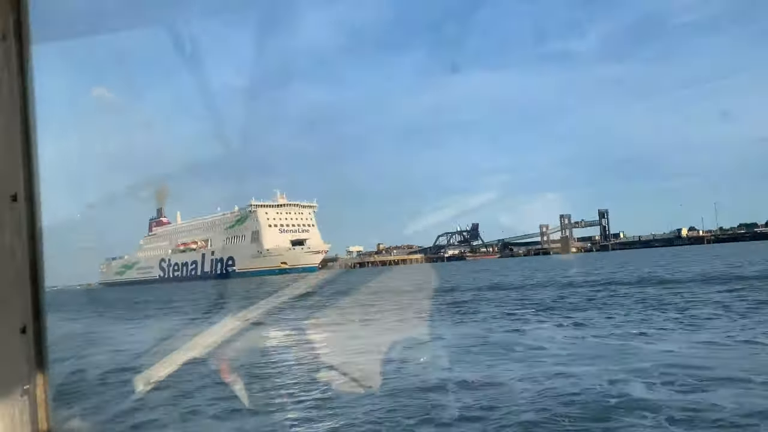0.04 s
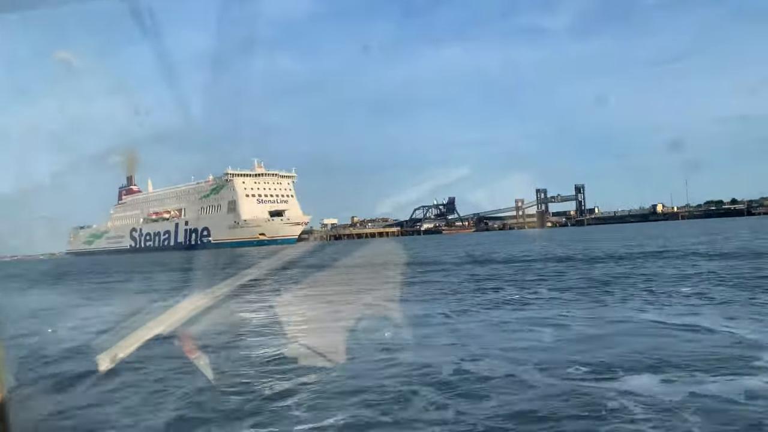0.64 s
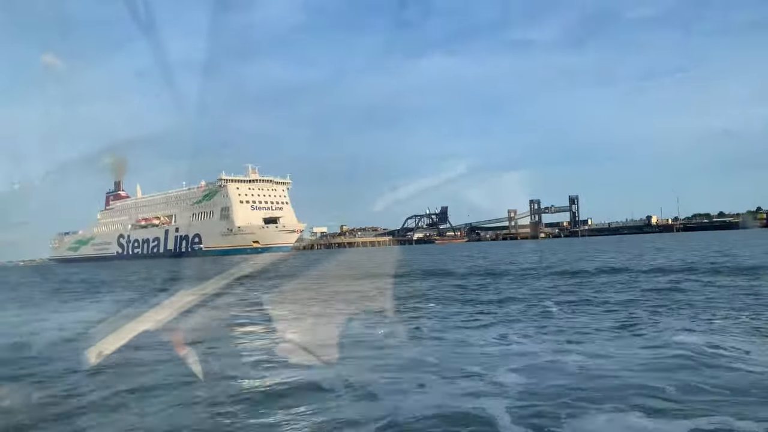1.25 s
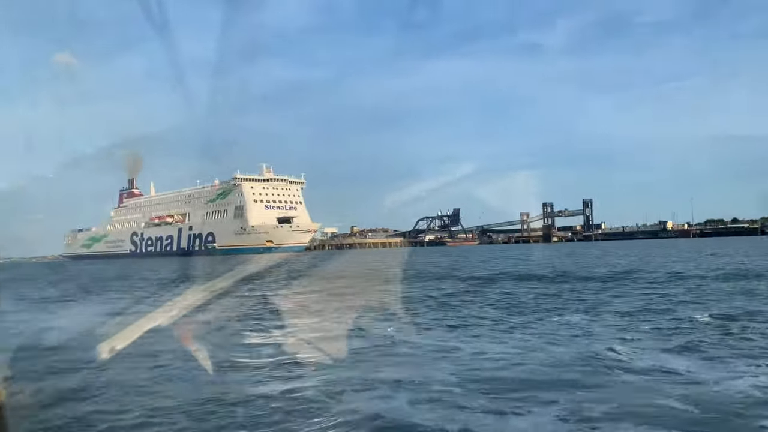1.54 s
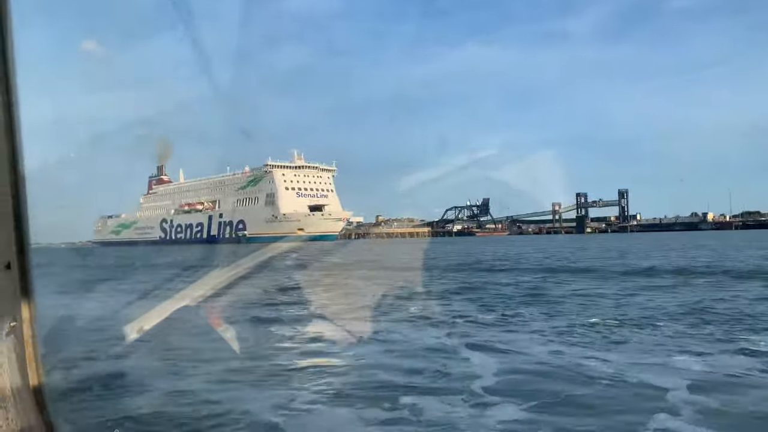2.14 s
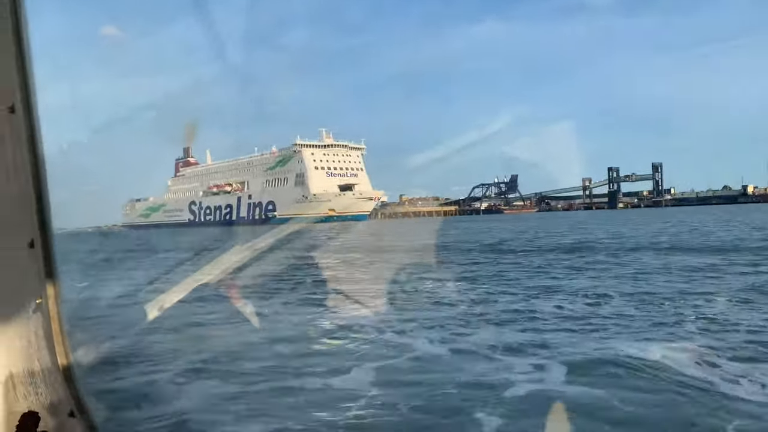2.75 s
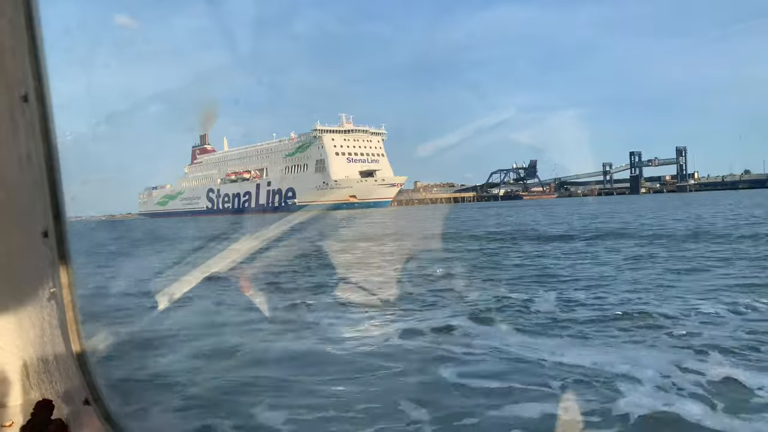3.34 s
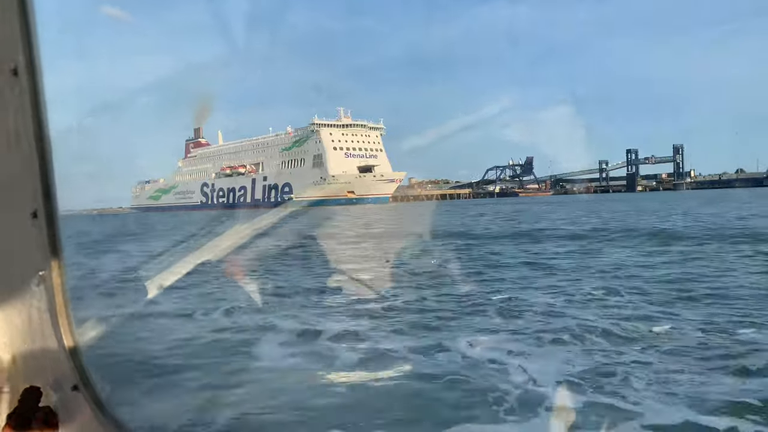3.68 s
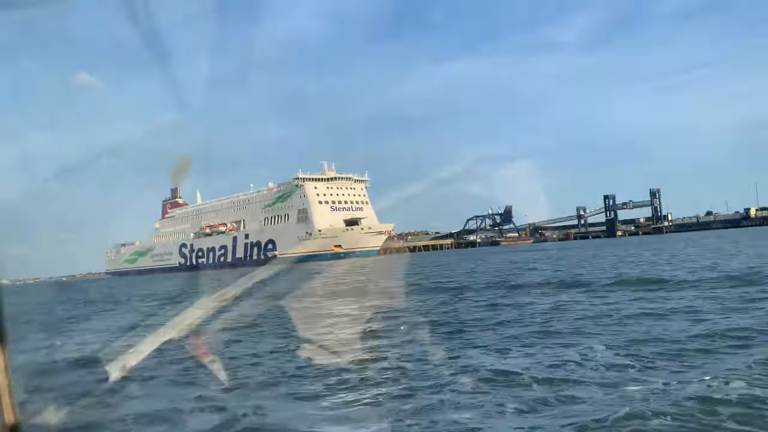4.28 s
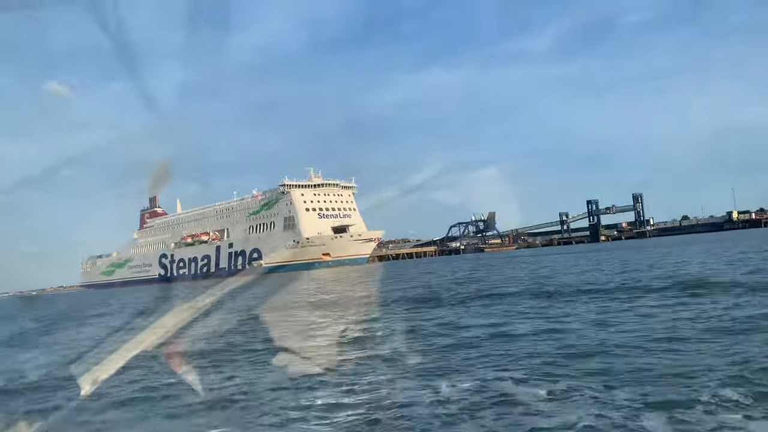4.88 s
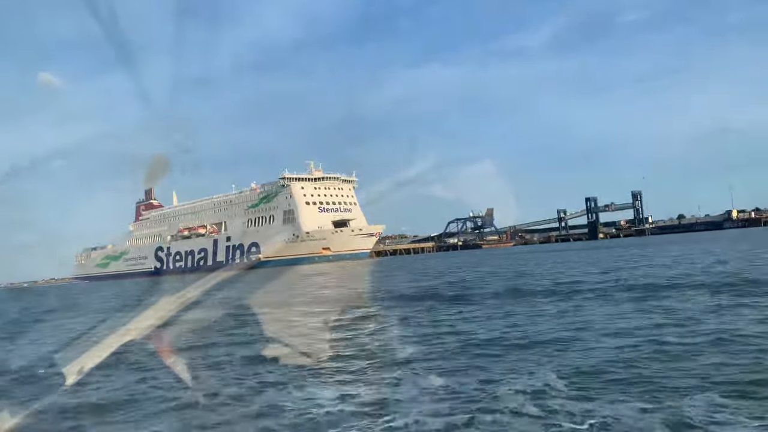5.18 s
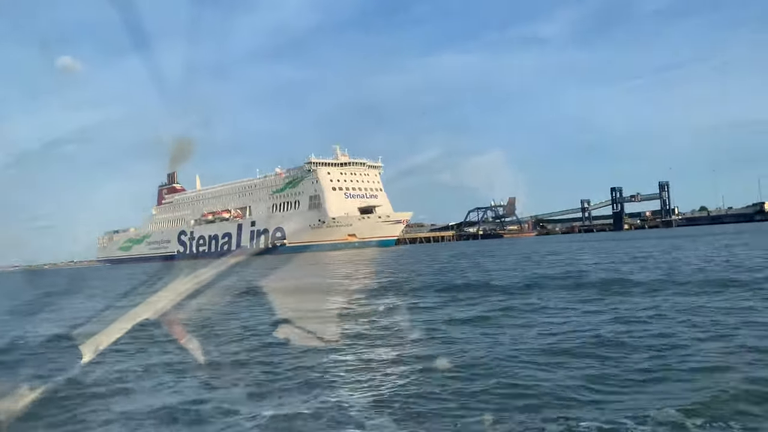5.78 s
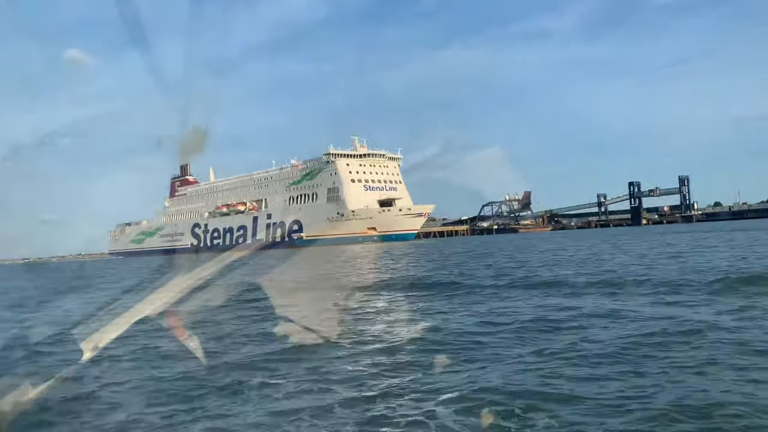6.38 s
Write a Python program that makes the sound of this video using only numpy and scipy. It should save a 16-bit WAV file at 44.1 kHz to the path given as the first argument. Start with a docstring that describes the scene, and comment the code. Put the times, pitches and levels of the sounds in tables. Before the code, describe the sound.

An outboard motor runs at cruising speed for the whole six and a half seconds, heard from inside a small boat's cabin. Its low drone booms at a nearly constant pitch, with a thin, wavering whine above it. Water rumbles deeply under the hull, while quieter foam, fine spray and small bubbles rush along the sides.

Soft hull thuds come in the first half second, followed by a few light wave slaps up to about 1.2 seconds. Stronger slaps with dull thumps land near 2.0 and 2.4 seconds. More follow at 3.2 and 3.4, faintly rattling a loose fitting. A brief hollow gurgle leads into the heaviest thuds at 3.8 and 4.1 seconds. A dull slap hits a panel at 4.6, a sharp smack at 5.1, and another slap with a thud at 5.3. Lighter splashes continue until about 6.1 as the motor drones on.

```python
"""Inside the cabin of a small boat at cruising speed, pushed by a four-cylinder four-stroke outboard.
Periodic combustion gives a harmonic series: the firing note booms in the cabin among weaker lines and
a thin whine, and the revs sway with the chop. Turbulence rumbles under the hull, foam rushes along its
sides, spray fizzes and bubbles ring. Now and then the hull thuds into a trough, or a wave slaps a
panel and rattles a loose fitting."""
import sys
import numpy as np
from scipy import signal
from scipy.fft import rfft, irfft
from scipy.io import wavfile
from scipy.ndimage import map_coordinates

SR = 44100
rng = np.random.default_rng(int(sys.argv[2]) if len(sys.argv) > 2 else 0)


def wrap_up_sound(samples):
    """Save the sound to the file named by the first command line argument, as 16-bit audio."""
    columns = np.atleast_2d(samples).T
    # keep every value between -1 and 1, then stretch to whole-number steps
    tamed = np.clip(columns, -1, 1)
    steps = np.round(tamed * 32767).astype(np.int16)
    wavfile.write(sys.argv[1], SR, steps)


N = 291942
TIME = np.arange(N) / SR
FREQ = np.maximum(np.arange(N // 2 + 1) * SR / N, 1)


def undb(db):
    """Decibels to amplitude ratio."""
    return 10 ** (np.asarray(db) / 20)


def unit(x):
    """Normalisation to rms 1."""
    return x / np.sqrt(np.mean(x ** 2))


def noise():
    """Two uncorrelated white noises."""
    return rng.standard_normal((2, N))


def walk(rate):
    """Smooth random drift through `rate` values a second, with a spread near 1."""
    knots = rng.standard_normal(1024)
    position = np.arange(0, N, 64) / SR * rate
    return 1.1 * map_coordinates(knots, [position], order=3, mode="wrap").repeat(64)[:N]


def swell(s, half_s):
    """A Gaussian rise and fall, 1 at its height."""
    return np.exp(-((TIME - s) / half_s) ** 2)


def easing(db_per_s):
    """A linear drift of level in dB, zero halfway through."""
    return db_per_s * (TIME - TIME.mean())


def decay(age, t60):
    """Exponential damping, 60 dB down at age t60."""
    return np.exp(-np.log(1000) * age / t60)


def stereo(mid, side):
    """Left and right as sum and difference."""
    return np.array([mid + side, mid - side])


def pan(db):
    """Interaural level difference: gains that put the left ear db above the right."""
    return undb([[db / 2], [-db / 2]])


def arriving(spectrum, lead_ms):
    """Interaural time difference: the left ear leads (lags if negative)."""
    return spectrum * np.exp(1j * np.pi * FREQ * lead_ms / 1000 * np.array([[1], [-1]]))


def coloured(colour, drive):
    """Spectral shaping: two drives become left and right spectra, falling steeply outside the table."""
    hz, db, correlation = np.transpose(colour)
    octave, knots = np.log2(FREQ), np.log2(hz)
    outside = np.abs(octave - np.clip(octave, knots[0], knots[-1]))
    gain = undb(np.interp(octave, knots, db) - 20 * outside) * np.sqrt(SR / 2)
    like = np.clip(np.interp(octave, knots, correlation), -1, 1)
    mid = rfft(drive[0]) * np.sqrt((1 + like) / 2)
    side = rfft(drive[1]) * np.sqrt((1 - like) / 2)
    return gain * stereo(mid, side)


def churn(spectrum, low_db, high_db, split_hz, flicker_db, flicker_rate):
    """Amplitude modulation: octave bands flicker about low_db below the split and high_db above it."""
    out = 0
    for octave in range(4, 15):
        band = irfft(spectrum * np.maximum(1 - np.abs(np.log2(FREQ) - octave), 0), N)
        high = 1 / (1 + (split_hz / 2 ** octave) ** 4)
        out = out + band * undb((1 - high) * low_db + high * high_db + flicker_db * walk(flicker_rate))
    return out


def ringing(hz, half_width_hz):
    """A resonance under random excitation, rms 1."""
    return unit(irfft(rfft(noise()) / (1 + ((FREQ - hz) / half_width_hz) ** 2), N))


def panel_ring(db=-45, hz=1450, throb_db=5.0):
    """Forced vibration: the engine shakes a panel that rings faintly, in uneven throbs."""
    return undb(db) * unit(ringing(hz, half_width_hz=55) * undb(throb_db * walk(7)))


# Air pockets along the hull. Each row: time of the peak in seconds, level in dB, note in Hz,
# half-length in seconds.
AIR_POCKETS = [(.55, -34, 1260, 0.017), (1.29, -43, 1230, 0.028), (2.34, -35, 1240, 0.033),
               (3.756, -33, 1240, 0.11), (4.16, -40, 1100, .03)]

def gulps():
    """Cavity resonance: a trapped pocket of air sounds its hollow note for a moment."""
    return sum(undb(db) * swell(s, half_s) * ringing(hz, half_width_hz=70)
               for s, db, hz, half_s in AIR_POCKETS)


def bubbles(db=-40.5, count=650, low_hz=1050, high_hz=4400, t60_cycles=100, glide=0.081):
    """Damped oscillation: each bubble in the wake rings on its own note, rising as it fades."""
    age = TIME[:SR // 10]
    out = np.zeros((2, N + len(age)))
    for when, pitch, size, left, right in rng.random((count, 5)):
        hz = low_hz * (high_hz / low_hz) ** pitch
        life = age * hz / t60_cycles
        phase = 2 * np.pi * (hz * age * (1 + glide * life) + np.array([[left], [right]]))
        ring = (1 - np.exp(-life * 20)) * decay(life, 1) * np.sin(phase)
        strength = undb(3 * min(-np.log(size), np.pi)) * np.sqrt(low_hz / hz)
        out[:, int(when * N) + np.arange(len(age))] += strength * ring
    return undb(db) * unit(out[:, :N])


def foam(drops_per_s, drop_share):
    """Shot noise: countless bursting drops of unequal size over a smooth hiss."""
    sizes = undb(2.6 * np.minimum(rng.exponential(size=(2, N)), 4))
    drops = noise() * (rng.random((2, N)) < drops_per_s / SR) * sizes
    return np.sqrt(1 - drop_share) * noise() + np.sqrt(drop_share) * unit(drops)


def cabin():
    """Interference: close reflections ripple the spectrum, mostly in the middle range."""
    ripple = 1.9 * np.interp(FREQ / 45, np.arange(2048), rng.standard_normal(2048))
    return undb(ripple * FREQ / (FREQ + 600) / (1 + (FREQ / 7000) ** 2))


# Spectra of the rush and the spray. Each row: frequency in Hz, relative spectral level in dB,
# interaural correlation (limited to -1..1 in use).
RUSH_SPECTRUM = [(400, -68, 0.78), (947, -57, 0.23), (990, -63, 0.041), (1360, -64.5, 0.46),
                 (2030, -65.5, 0.64), (2530, -68, -0.59), (2780, -65.5, 0.56), (2780, -69.5, -0.076),
                 (3980, -72, 0.1), (4500, -72.5, -0.55), (5720, -76, 0.77), (7100, -90, 0.97)]
SPRAY_SPECTRUM = [(5000, -87, 0.21), (6190, -74.5, -0.16), (9000, -72, -1.75), (12100, -74, -0.069),
                  (13300, -78.5, -1.4), (15900, -77.5, -0.03)]
# Crests breaking into spray. Each row: time of the peak in seconds, half the rise in dB,
# half-length in seconds.
BREAKING_CRESTS = [(0.252, 0.5, 0.094), (0.588, 0.6, 0.04), (0.805, 0.5, 0.044), (1.264, 1.15, 0.094),
                   (2.146, 0.6, 0.046), (2.856, 0.5, 0.22), (3.447, 1, 0.053), (4.156, 1, 0.073),
                   (4.335, 0.9, 0.049), (4.85, 0.5, 0.15), (5.797, 0.8, 0.062)]

def wake(surge_db=.4):
    """Flow noise: foam rushes on one side, finer spray fizzes on the other; both surge with the chop."""
    crests_db = 2 * sum(half_db * swell(s, half_s) for s, half_db, half_s in BREAKING_CRESTS)
    rush_db = easing(-0.12) + crests_db
    spray_db = -0.73 + easing(-0.24) + crests_db
    rush = arriving(coloured(RUSH_SPECTRUM, foam(drops_per_s=2500, drop_share=.25)), lead_ms=.3)
    spray = arriving(coloured(SPRAY_SPECTRUM, foam(drops_per_s=8000, drop_share=.15)), lead_ms=-.233)
    inside = (rush * pan(-1.2) + spray) * cabin()
    water = churn(inside, rush_db, spray_db, split_hz=5000, flicker_db=.45, flicker_rate=45)
    return water * undb(surge_db * walk(10))


# The hull drops into troughs. Each row: start in seconds, envelope peak in dB, note in Hz,
# 60 dB decay time in seconds.
TROUGHS = [(.13, -18, 70, 0.31), (0.369, -16, 86, 0.2), (1.16, -20, 42, .2), (1.941, -15, 62, 0.36),
           (2.37, -14, 61.5, 0.39), (3.14, -20, 78, .35), (3.829, -11.5, 83, 0.75), (4.076, -7.5, 72, 0.42),
           (5.349, -12, 75, 0.26)]

def thuds(rise_s=0.011):
    """Free vibration: a soft blow from below sets the whole hull swinging for a few cycles."""
    out = np.zeros(N)
    for s, db, hz, t60 in TROUGHS:
        age = np.maximum(TIME - s, 0)
        envelope = (1 - np.exp(-age / rise_s)) * decay(age, t60)
        out += undb(db) * envelope / envelope.max() * np.sin(2 * np.pi * hz * age)
    return out


# Water heard through the hull. Each row: frequency in Hz, relative spectral level in dB,
# interaural correlation.
HULL_SPECTRUM = [(14, -61, .98), (30.2, -47.5, 0.6), (55, -43.5, 0.89), (101.5, -36.5, 1), (124, -43.5, 1),
                 (194, -37, 1), (205, -37.5, 1), (280, -49.5, 0.85), (376, -48.5, 0.69), (710, -59, 0.42),
                 (935, -71, 0.0032), (1600, -80, 0)]

def hull_water(gain_db=-1.0, trough_db=2):
    """Turbulent pressure drives the hull: a deep rumble that swells in the troughs, and a hollow slosh."""
    troughs = np.max([swell(s, half_s=0.11) for s, *_ in TROUGHS], axis=0)
    rumble_db = easing(-0.32) + trough_db * troughs + 0.04 * walk(10)
    slosh_db = rumble_db / 2 + 0.5 * walk(10)
    turbulence = coloured(HULL_SPECTRUM, noise())
    water = churn(turbulence, rumble_db, slosh_db, split_hz=140, flicker_db=.4, flicker_rate=15)
    return water * undb(gain_db) * pan(-0.3)


# Modes of a loose cabin fitting. Each row: frequency in Hz, relative level in dB,
# 60 dB decay time in seconds.
FITTING_MODES = [(1260, -3, .04), (1880, -3, .03), (2350, -3, .03), (3750, -3, .025), (4230, -2, .03),
                 (4780, -3, .02), (5900, -3, .02), (7050, -6, .015), (8450, -6, .015)]

def rattle(touches=4, gap_s=0.0089, bounce_db=0.5):
    """Repeated impact: each touch of the fitting excites its modes in different proportions."""
    age = TIME[:SR // 4]
    out = np.zeros((2, len(age)))
    for k in range(touches):
        since = np.maximum(age - k * gap_s * rng.uniform(.85, 1.0), 0)
        for hz, db, t60 in FITTING_MODES:
            ring = np.sin(2 * np.pi * hz * since) * decay(since, t60)
            out += undb(db + k * bounce_db) * rng.standard_normal((2, 1)) * ring
    return out / np.sqrt(np.mean(out[:, :SR // 100] ** 2))  # rms 1 over the first 10 ms


# Spectra of a slap's splash, struck panel and dry first contact. Each row: frequency in Hz,
# relative level in dB, interaural correlation.
SPLASH_SPECTRUM = [(400, -14, .4), (800, 12, 0.43), (1300, -1, 0.25), (1910, 10, 0.23), (3270, 2.5, 0.18),
                   (4830, 2.5, 0.5), (8500, -2.5, 0.021), (15000, 0, 0)]
PANEL_SPECTRUM = [(120, -22, .9), (260, -4, .9), (390, 0, .8), (650, -9, .5), (1400, -25, 0)]
CRACK_SPECTRUM = [(700, -8, .5), (1500, 0, .6), (2800, -1, .5), (4700, 0, .6), (9000, -12, 0)]
# Waves slapping the side. Each row: start in seconds, level in dB, rise and 60 dB decay times in
# seconds, treble and panel gains in dB, panel note in Hz, rattle and crack gains in dB.
WAVE_SLAPS = [(.545, -32, .004, .2, -4, 15, 450, -18, -20),
              (.72, -34.5, .004, 0.2, -6, 23.5, 340, -20, -20),
              (.866, -31.5, .006, 0.19, -4, 11.5, 520, -20, -15),
              (0.889, -32.5, 0.0025, .42, -6, 16.5, 410, -20, -12),
              (1.17, -37, .005, .3, 0, 3, 390, -14, -20), (1.711, -37, .004, 0.15, -5, 23, 390, -20, -20),
              (1.951, -22, 0.0033, 0.2, -12, -3, 387, -9, -13),
              (2.378, -24, 0.0061, 0.44, -6, 12.5, 200, -16, -20),
              (3.153, -29.5, .003, 0.34, 1, 10.5, 389, -5, -15),
              (3.408, -27, .003, .19, -5, 6, 390, -16, -15), (3.73, -32, .004, .22, 1, 1, 392, -16, -20),
              (3.826, -25, 0.0028, 0.23, 0, 7, 600, -11, -10),
              (4.42, -37, 0.004, 0.22, -3, 20, 360.4, -20, -20),
              (4.561, -27, .005, 0.34, -14, 20, 229.4, -24, -20),
              (4.805, -40.5, 0.0058, 0.39, -3, 28, 175, -22, -18),
              (5.115, -20.5, .0005, 0.11, -4, 5, 386, -12, 0),
              (5.126, -24, .001, 0.14, -11, 6, 700, -20, -3),
              (5.165, -40.5, 0.0085, 0.48, -8, 20.5, 380, -20, -20),
              (5.343, -24.5, .002, 0.33, -3.5, 6, 390, -12, -10),
              (5.55, -39, .006, 0.28, 4, 17.5, 400, -12, -9), (5.6, -34, .003, 0.15, 4, 9, 400, -14, -12),
              (5.719, -36, .004, 0.17, -3, 20, 340, -20, -20), (6.052, -31, .003, .2, 1, 6, 390, -14, -12)]

def slaps(treble_hz=3000, crack_t60=0.025, panel_peak_hz=390):
    """Impact excitation: a wave cracks and splashes over a panel's dull note, shaking the fitting."""
    splash, panel, crack = (unit(irfft(coloured(spectrum, noise()), N))
                            for spectrum in (SPLASH_SPECTRUM, PANEL_SPECTRUM, CRACK_SPECTRUM))
    treble = irfft(rfft(splash) / (1 + (treble_hz / FREQ) ** 4), N)
    out = np.zeros((2, N))
    for s, db, rise_s, t60, treble_db, panel_db, note_hz, rattle_db, crack_db in WAVE_SLAPS:
        chatter = undb(rattle_db) * rattle()
        age = TIME[:chatter.shape[1]]
        span = int(s * SR) + np.arange(len(age))
        retuned = span * note_hz / panel_peak_hz  # resampling moves the panel's peak to this note
        note = np.array([map_coordinates(ear, [retuned], order=1, mode="wrap") for ear in panel])
        envelope = (1 - np.exp(-age / rise_s)) * decay(age, t60)
        wet = splash[:, span] + (undb(treble_db) - 1) * treble[:, span]
        contact = undb(crack_db) * decay(age, crack_t60) * crack[:, span]
        out[:, span] += undb(db) * (envelope * (wet + undb(panel_db) * note) + contact + chatter)
    return out


# The drive's whine at the listener. Each row: time in seconds, gain in dB,
# added interaural phase difference in radians.
WHINE_PATH = [(0, 0.5, 0.57), (.13, 0, 0), (.3, -1.5, 0.99), (.53, -2, 1.5), (.6, 0, .4), (.72, -1.5, .3),
              (.9, 0.5, 0), (1.02, 4.5, 0), (1.25, 1, 0), (1.6, 1.5, 0), (1.8, 0.5, 0.38), (1.98, -5, 1.3),
              (2.15, 4.5, 0), (2.5, 0, 0), (2.85, -2, 0), (3.1, -0.5, .7), (3.45, 0, 0.068), (3.85, 3.5, 0),
              (3.93, -1, 1.1), (4.02, 5, 0), (4.12, -4, 0), (4.25, 1, 0), (4.6, 4.5, 0), (4.9, 1.5, 0),
              (5.12, 6, 0), (5.25, -1.5, -0.5), (5.5, 1.5, 0), (5.6, 1, .3), (5.75, .5, 0), (5.9, 5.5, 0),
              (6.03, -2, 0), (6.62, 1, 0)]

def whine_amplitude(waver=0.21, wobble_rad=.4):
    """Standing waves: the whine's level and phase change as the listener moves through them."""
    times, levels, phases = np.transpose(WHINE_PATH)
    size = undb(np.interp(TIME, times, levels) - 0.1) * (1 + waver * walk(12))
    ear_phase = stereo(0, np.interp(TIME, times, phases) / 2)
    return size * np.exp(1j * (ear_phase + wobble_rad * walk(11)))


# The hum at three times the firing rate. Each row: time in seconds, gain in dB.
HUM_GAIN = [(0, 2), (.7, 1), (1.5, -3), (2.3, 1), (3.15, 1.5), (4.0, -1.5), (4.8, -0.5), (5.7, -2),
            (6.62, -2)]

def hum_amplitude(waver=0.15):
    """Amplitude modulation: the hum swells and sinks slowly under a quicker waver."""
    return undb(np.interp(TIME, *np.transpose(HUM_GAIN))) * (1 + waver * walk(12))


# Engine speed under changing propeller load. Each row: time in seconds, firing rate in Hz.
FIRING_RATE = [(0, 152.6), (.45, 153.3), (1.13, 152.3), (2, 153.3), (2.32, 152.3), (2.9, 152.9),
               (3.4, 152.5), (3.7, 153.05), (4.3, 152.7), (4.52, 152.25), (4.95, 152.0), (5.38, 152.95),
               (5.85, 152.45), (6.18, 151.8), (6.62, 152.7)]
# Engine harmonics. Each row: multiple of the four-stroke cycle rate, base mid and side levels in dB,
# left minus right in dB.
ENGINE_ORDERS = [(2, -27, -43, 3), (4, -12, -30, 2), (5, -32, -47, -2), (6, -26, -41, 1), (7, -41, -46, -4),
                 (8, -37, -47, -5), (9, -43, -42, 2), (10, -36, -44, 3), (11, -43, -39, 5),
                 (12, -31.5, -37, -3), (13, -47, -38, 3), (14, -46, -40, 1), (15, -39, -46, 2),
                 (16, -42, -46, -5), (17, -42, -46, -2), (18, -44, -53, 0), (19, -47, -52, 2),
                 (20, -46, -54, -2), (21, -46, -43, 2), (22, -47, -52, 0), (23, -48, -49, 5),
                 (24, -34, -40, -5), (25, -45, -47, 0), (26, -51, -50, 2), (28, -51, -54, 3),
                 (29, -51, -56, 2), (32, -50, -51, 0), (33, -52, -56, -2), (38, -50, -52, 2),
                 (40, -55, -53, 3)]
FIRING_ORDER, HUM_ORDER, WHINE_ORDER = 4, 12, 24

def engine(boom_db_per_hz=1.5, boom_wander_db=0.93, waver=0.37):
    """Harmonics locked to the crank; uneven combustion makes the weak ones waver in size and phase."""
    firing_hz = np.interp(TIME, *np.transpose(FIRING_RATE))
    cycle = np.cumsum(firing_hz / FIRING_ORDER) / SR
    # the firing note booms in the cabin, louder as the revs rise
    boom_db = 0.44 + boom_db_per_hz * (firing_hz - firing_hz.mean()) + easing(-0.1)
    out = np.zeros((2, N))
    for order, mid_db, side_db, pan_db in ENGINE_ORDERS:
        if order == FIRING_ORDER:
            size = undb(boom_db + boom_wander_db * walk(7))
        elif order == WHINE_ORDER:
            size = whine_amplitude()
        elif order == HUM_ORDER:
            size = hum_amplitude()
        else:
            uneven = 1 + waver * (walk(12) + 1j * walk(12))
            size = undb(0.06) * uneven / np.sqrt(1 + 2 * waver ** 2)
        line = np.sqrt(2) * size * np.exp(2j * np.pi * (order * cycle + rng.random()))
        # standing waves in the cabin give each line its own lag and balance between the ears
        ears = stereo(undb(mid_db), 1j * undb(side_db))[:, None] * pan(pan_db)
        out += (line * ears).real
    return out


def scene():
    """Superposition: the sounds of engine and water add."""
    return engine() + panel_ring() + hull_water() + wake() + bubbles() + gulps() + slaps() + thuds()


def record(dry, ceiling=.96, top_hz=15750):
    """Soft saturation rounds the highest peaks; a steep low-pass filter cuts the top."""
    rounded = dry / (1 + (dry / ceiling) ** 8) ** (1 / 8)
    return signal.sosfilt(signal.ellip(10, .1, 80, top_hz, fs=SR, output="sos"), rounded)


dry = scene()
out = record(dry)
wrap_up_sound(out)
```